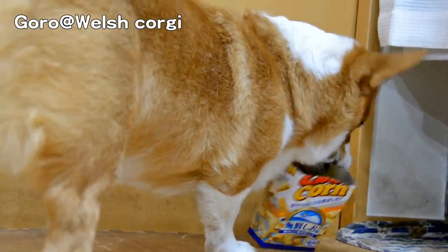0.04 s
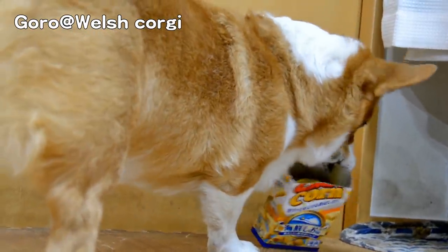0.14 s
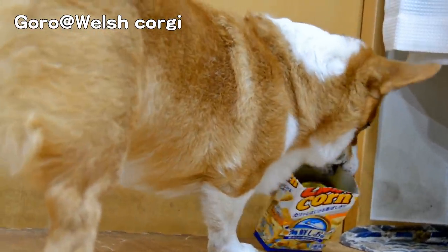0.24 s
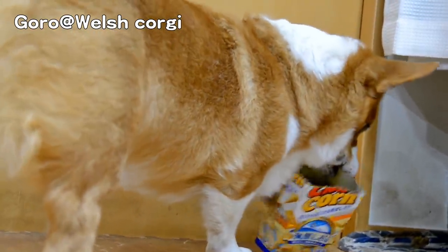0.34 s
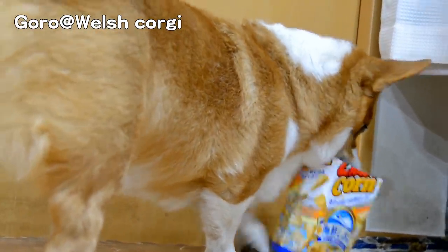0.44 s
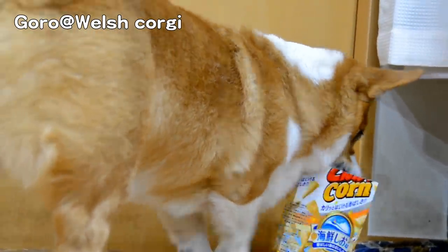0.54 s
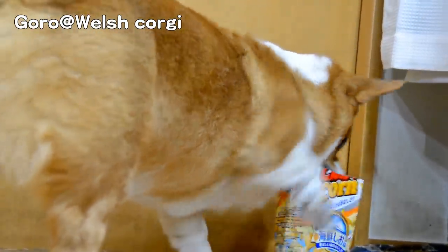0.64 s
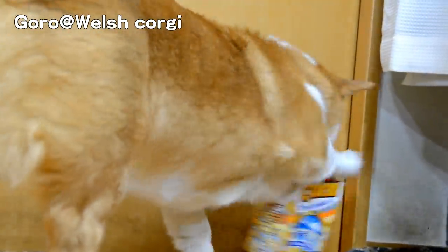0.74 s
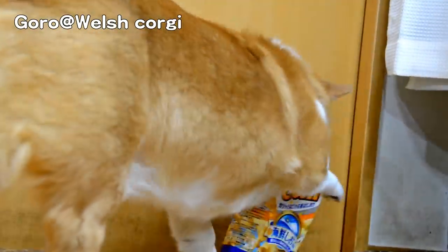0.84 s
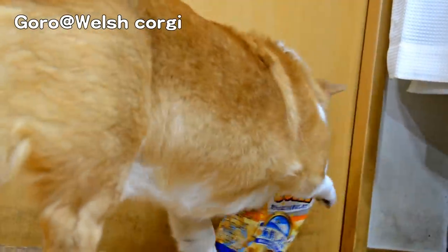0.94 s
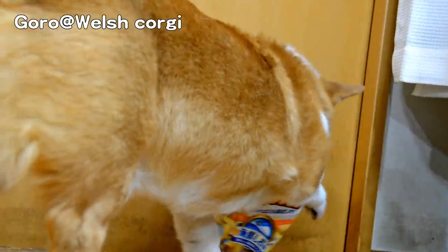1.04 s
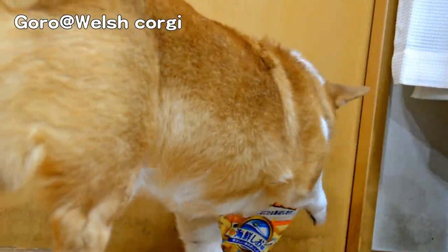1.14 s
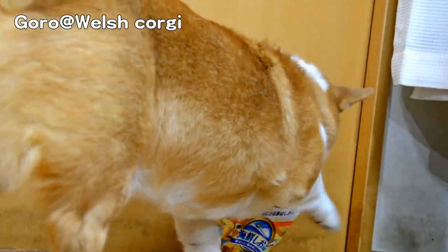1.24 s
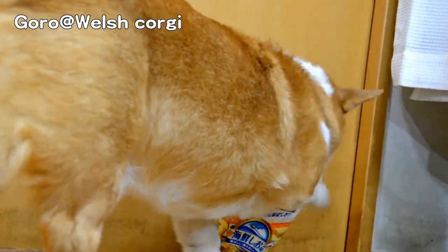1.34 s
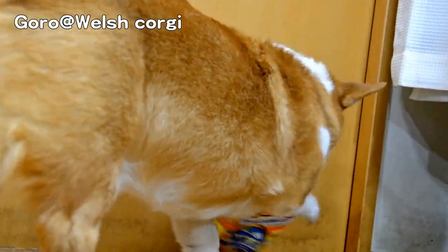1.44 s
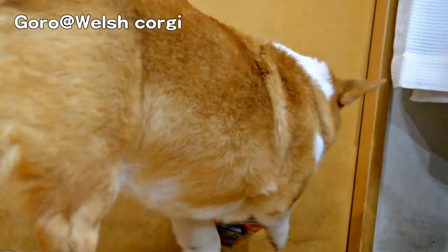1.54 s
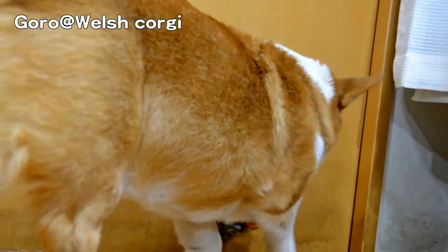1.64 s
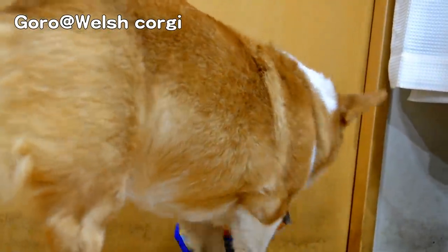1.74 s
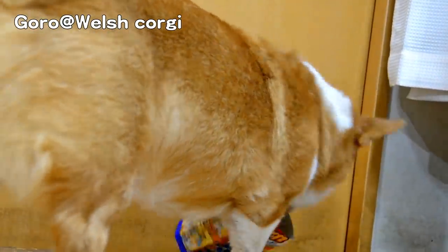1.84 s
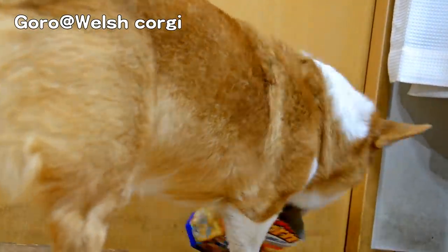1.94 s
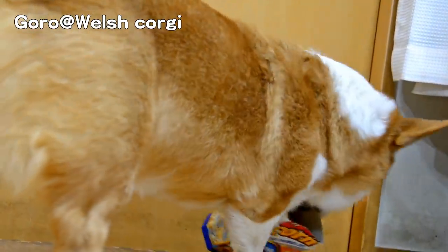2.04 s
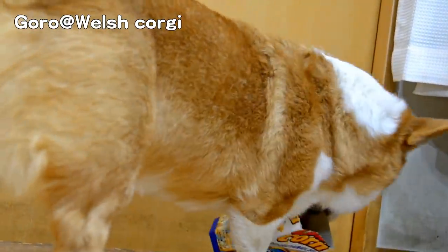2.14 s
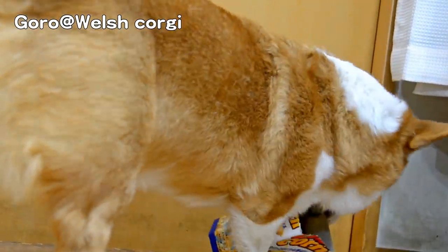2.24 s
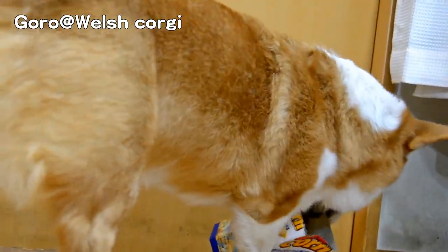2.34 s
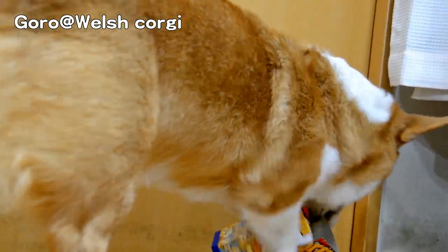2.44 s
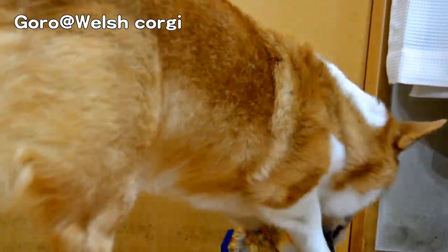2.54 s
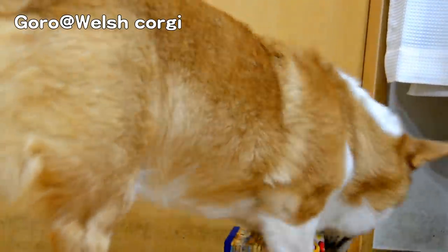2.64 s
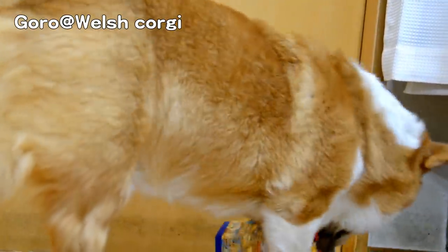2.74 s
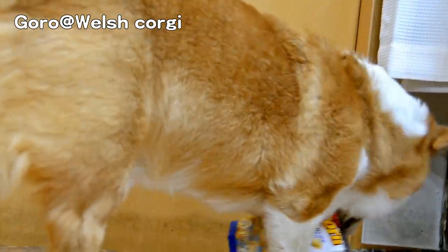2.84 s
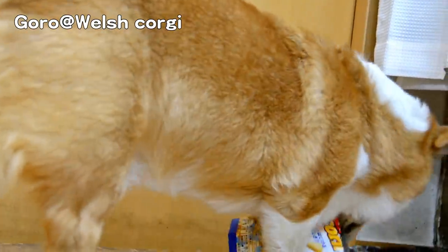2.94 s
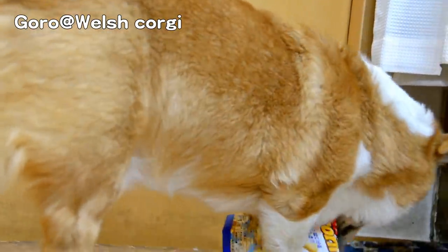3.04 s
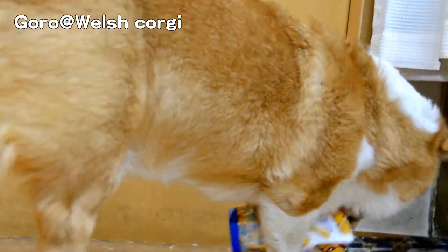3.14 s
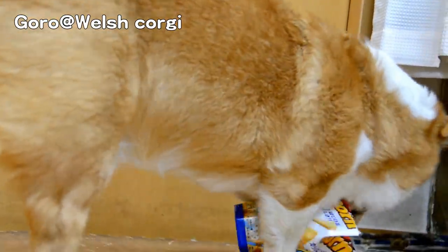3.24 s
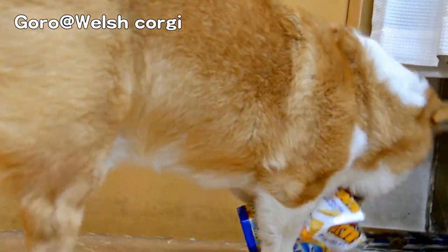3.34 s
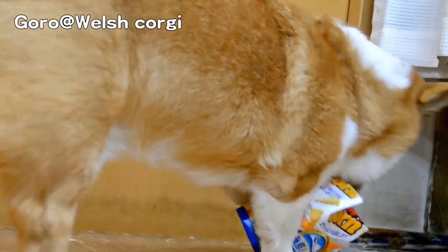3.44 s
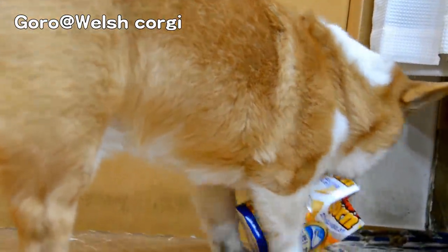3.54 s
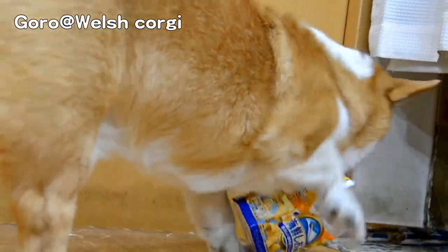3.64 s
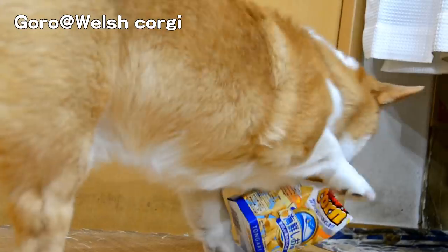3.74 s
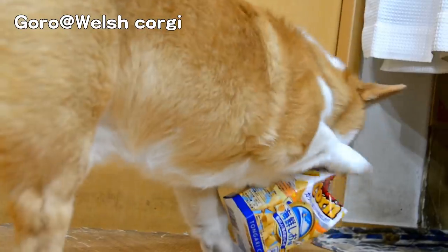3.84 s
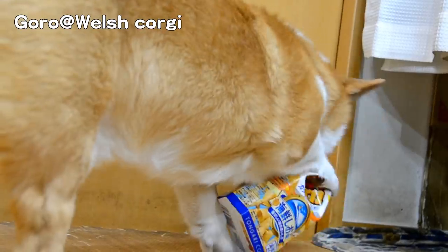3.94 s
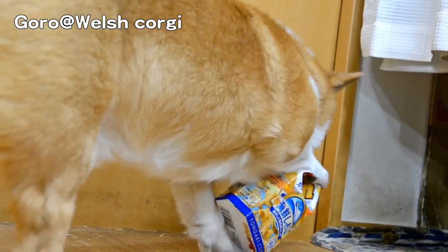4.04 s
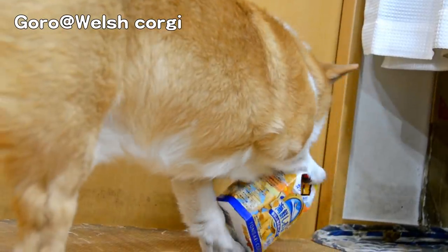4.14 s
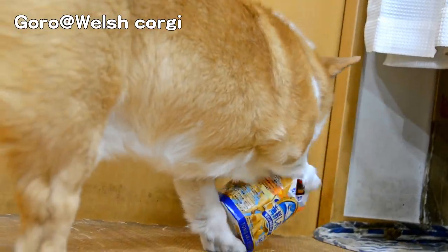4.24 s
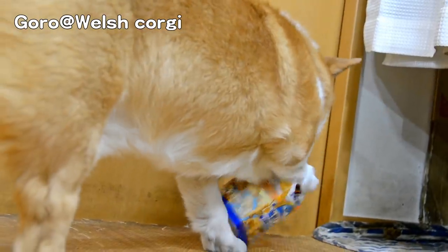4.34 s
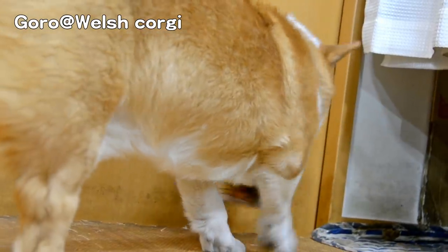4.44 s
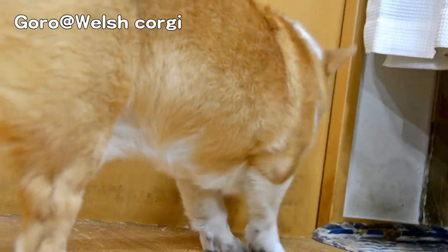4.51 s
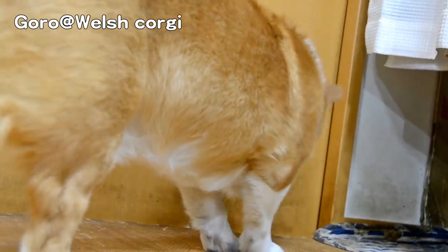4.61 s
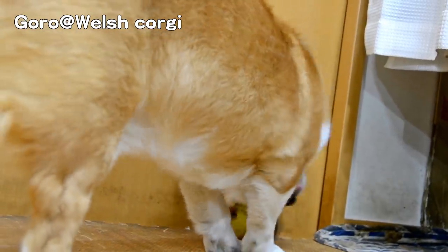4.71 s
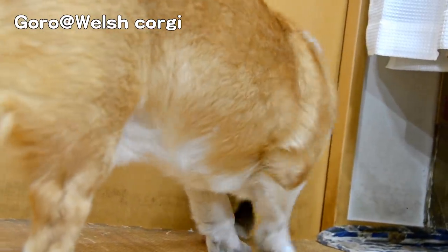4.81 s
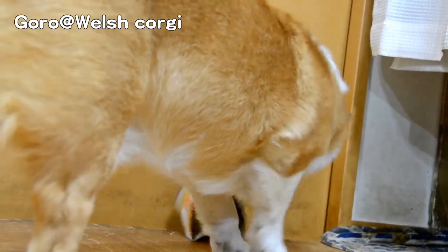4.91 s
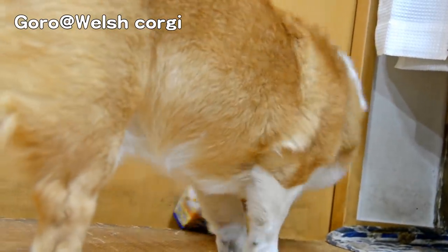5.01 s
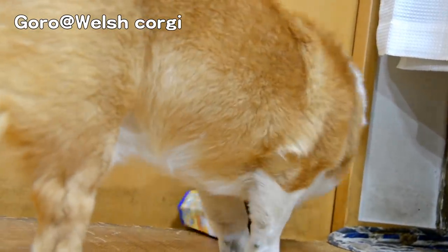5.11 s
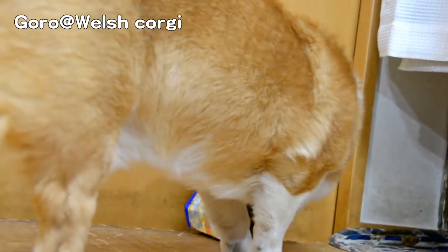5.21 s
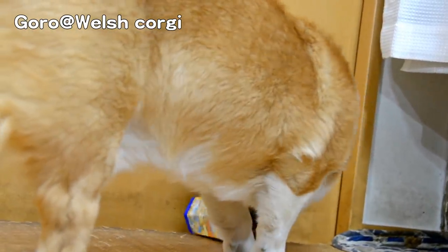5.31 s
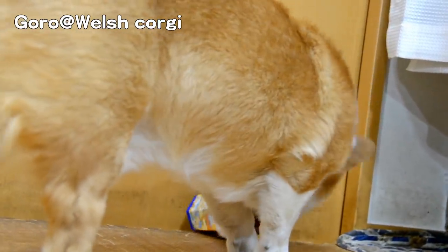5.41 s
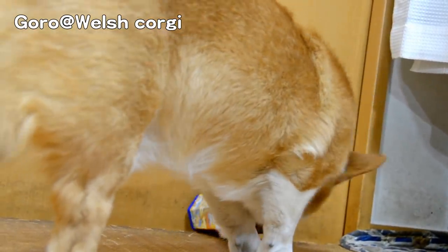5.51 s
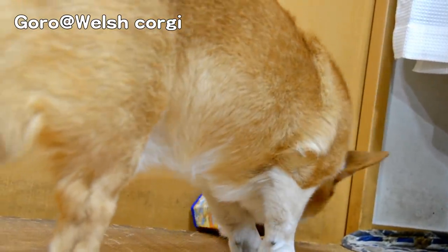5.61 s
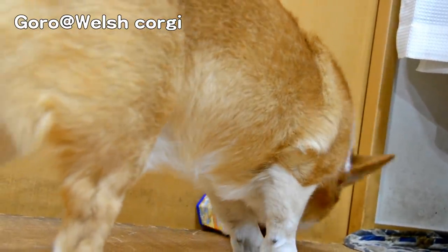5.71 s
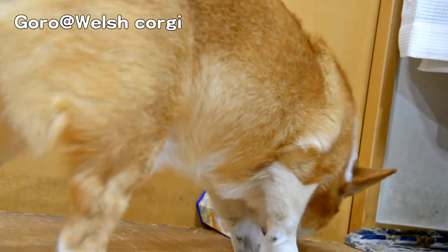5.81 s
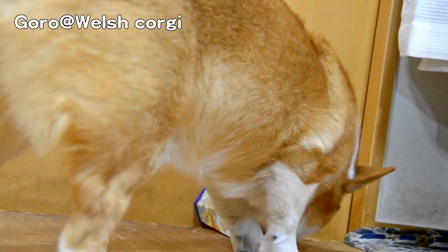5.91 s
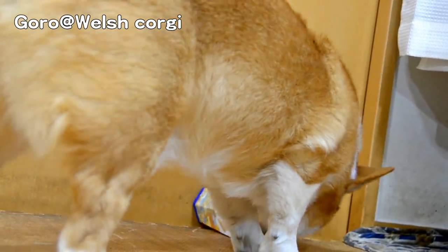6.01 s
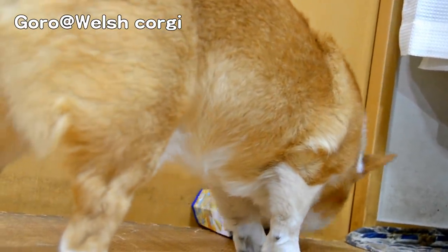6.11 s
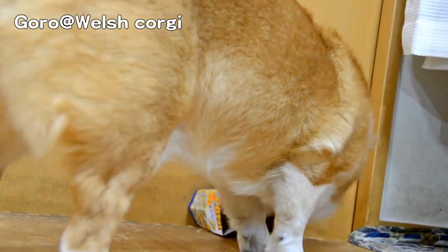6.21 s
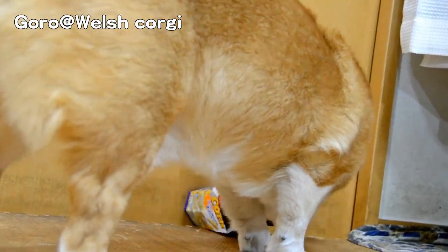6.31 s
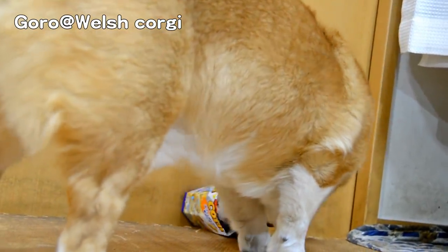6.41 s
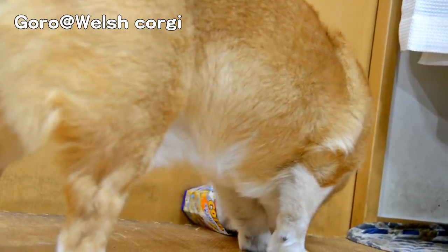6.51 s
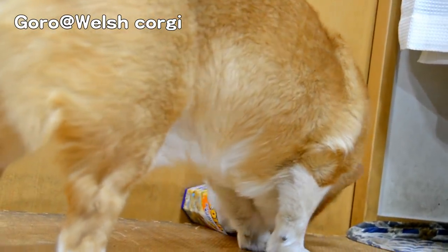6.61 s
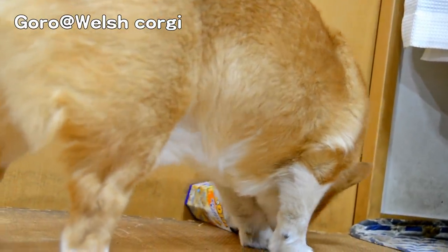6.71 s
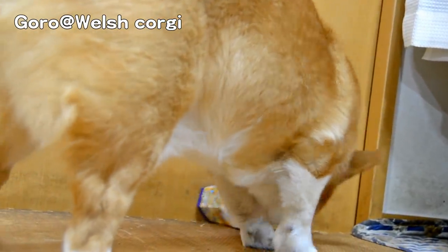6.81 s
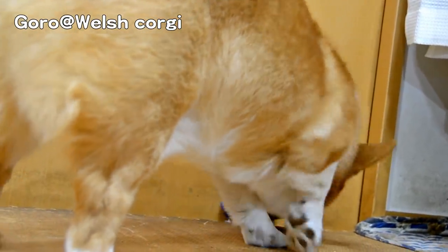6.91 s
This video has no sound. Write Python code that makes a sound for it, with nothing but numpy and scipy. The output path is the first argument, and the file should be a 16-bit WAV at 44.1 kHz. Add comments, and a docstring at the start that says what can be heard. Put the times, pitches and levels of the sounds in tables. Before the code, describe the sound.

A dog shoves a light cardboard carton over floorboards in a small room, heard close. Hollow papery knocks come in uneven bursts among stuttering scrapes, crinkles, claw ticks and soft paw thumps. The strongest blows, with deep floor booms, fall past the middle; then the knocking stops, leaving small rustles and scuffs over faint room air and a very high thin whine.

```python
"""A dog paws and noses a small cardboard carton over a wooden floor, close to a door in a small room.
From the start faint room noise and a thin electronic whine lie under stick-slip rubbing and soft hisses.
At once come blows that ring the carton's walls and stir the room, with ticks, snaps, rustles and pad thumps.
From 0.8 s the floorboards boom under weight, most strongly at about 4.8 s; the last blow falls near 5.8 s
and only small scrapes, rustles, pad thumps and soft hisses remain."""
import sys
import numpy as np
from scipy import signal
from scipy.fft import rfft, irfft, next_fast_len
from scipy.io import wavfile
from scipy.ndimage import uniform_filter1d

SR = 44100
rng = np.random.default_rng(int(sys.argv[2]) if len(sys.argv) > 2 else 0)


def file_out(sig):
    """Save sig as 16-bit WAV at sys.argv[1]."""
    # one column per channel
    cols = np.atleast_2d(sig).T
    # limit, then scale
    lim = np.clip(cols, -1, 1)
    pcm = np.round(lim * 32767).astype(np.int16)
    wavfile.write(sys.argv[1], SR, pcm)


N = 306936  # length [samples]

# edges of a blow's five registers: thud, hollow, knock, clack, crackle: (frequency [Hz])
REGISTER_EDGES = [130, 300, 700, 1200, 2400, 14000]


def undb(db):
    """Decibels to gain."""
    return 10 ** (np.asarray(db) / 20)


def unit(x):
    """Scale to rms 1."""
    return x / np.sqrt(np.mean(x ** 2) + 1e-30)


def seconds(length_s):
    """Time axis of a short sound [s]."""
    return np.arange(int(length_s * SR)) / SR


def at_hz(points, hz):
    """Read (Hz, value) points on a log-frequency axis."""
    f, value = np.transpose(points)
    return np.interp(np.log(hz + 1), np.log(f), value)


def at_time(points, t):
    """Read (s, value) points along time."""
    return np.interp(t, *np.transpose(points))


def colour(x, points):
    """Filter a sound by a curve of (Hz, dB) points, then scale to rms 1."""
    size = next_fast_len(2 * len(x))
    gain = undb(at_hz(points, np.fft.rfftfreq(size, 1 / SR)))
    return unit(irfft(rfft(x, size) * gain, size)[:len(x)])


def band(x, lo_hz, hi_hz, order=3):
    """Causal band-pass."""
    sos = signal.butter(order, [lo_hz, min(hi_hz, SR / 2 - 1)], "band", fs=SR, output="sos")
    return signal.sosfilt(sos, x)


def fade(t, t60):
    """Exponential decay, 60 dB down after t60."""
    return np.exp(-np.log(1000) * t / t60)


def walk(rate):
    """Smooth random wandering of rms 1, with a new target `rate` times a second."""
    k = max(int(SR / rate), 1)
    held = np.repeat(rng.standard_normal(N // k + 1), k)
    return unit(uniform_filter1d(held, k)[:N])


def add(out, s, x):
    """Mix a sound in at time s."""
    i = max(int(s * SR), 0)
    out[i:i + len(x)] += x[:max(N - i, 0)]


def room(t, wet_db, build_s=0.0055):
    """Direct sound, then reflections that thicken within milliseconds and die at a rate set for each octave."""
    # reverberation time of the room: (frequency [Hz], t60 [s])
    reverb_times = [(100, 0.29), (300, 0.2), (700, 0.22), (1500, 0.19), (4000, 0.25), (10000, 0.16)]
    start_rate, crowd_s = 420, 0.02  # echoes per second at first; time for that rate to double [s]
    density = np.minimum(start_rate / SR * (1 + (t / crowd_s) ** 2), 1)
    echoes = rng.choice([-1, 1], len(t)) * (rng.random(len(t)) < density) / np.sqrt(density)
    edges = 70 * 2. ** np.arange(9)  # octaves [Hz]
    tail = np.zeros(len(t))
    for lo, hi in zip(edges, edges[1:]):
        tail += band(echoes, lo, hi, order=2) * fade(t, at_hz(reverb_times, np.sqrt(lo * hi)))
    tail *= 1 - np.exp(-(t / build_s) ** 2)
    response = undb(wet_db) * tail / np.linalg.norm(tail)
    response[0] += 1  # the direct sound
    return response


def background():
    """Still room air as coloured noise, and an appliance's whine as a slightly wavering sine."""
    # colour of the still room: (frequency [Hz], relative level [dB])
    air_colour = [(20, -4), (45, -13), (70, -8), (94, 6.5), (120, -4.5), (180, 2.5), (270, -6), (420, -2.5),
                  (1000, -2.5), (1700, -8), (2500, -15), (4000, -24), (8000, -34), (12000, -34),
                  (14500, -64)]
    # the whine: (time [s], level [dB])
    whine_level = [(0, -65), (1.2, -66.5), (2.1, -66.5), (3.1, -64), (4.1, -73), (5.3, -70), (6.9, -72)]
    air_db, whine_hz = -56.5, 15631
    t = np.arange(N) / SR
    air = colour(rng.standard_normal(N), air_colour) * undb(air_db + 0.21 * walk(30))
    waver = .5 * walk(8)  # phase [rad]
    whine = unit(np.sin(2 * np.pi * whine_hz * t + waver))
    return air + whine * undb(at_time(whine_level, t) + 1.2 * walk(6))


def slips(rate, smooth):
    """Stick-slip: small catches of uneven size over a smooth sliding noise."""
    size = undb(3.5 * np.minimum(rng.exponential(size=N), 3))
    catches = (rng.random(N) < rate / SR) * rng.choice([-1, 1], N) * size
    return unit(catches) + smooth * rng.standard_normal(N)


def strokes(rows, rise_s, fall_s):
    """Level of strokes: each swells up to its start, holds and dies away; rise and fall are times for 60 dB."""
    t, power = np.arange(N) / SR, np.zeros(N)
    for s, length, db in rows:
        rise = fade(np.clip(s - t, 0, 1), rise_s)
        fall = fade(np.clip(t - s - length, 0, 1), fall_s)
        power += (undb(db) * rise * fall) ** 2
    return np.sqrt(power)


def shifting(force, points):
    """Rubbing heard from a carton on the move: its flexing walls shift resonance and its reflections change."""
    flex_octaves = 0.02  # rms shift of the resonances
    out, t = np.zeros(N), seconds(.2)
    step = int(.16 * SR)
    for i in range(0, N, step):
        flex = 2 ** (flex_octaves * rng.uniform(-np.sqrt(3), np.sqrt(3)))
        piece = signal.fftconvolve(force[i:i + step], room(t, wet_db=2.0))
        onset = np.minimum(np.arange(len(piece)) / (.002 * SR), 1)  # 2 ms ramp
        add(out, i / SR, onset * colour(piece, [(hz * flex, db) for hz, db in points]))
    return unit(out)


def crinkles(effort, count):
    """Creases in the card pop at random, each with its own pitch and size, louder the harder it is scraped."""
    # level of a small pop by its pitch: (frequency [Hz], relative level [dB])
    pop_levels = [(550, -10.5), (900, -0.5), (1600, 0), (2300, -2.5), (3600, -17)]
    decay_cycles = 9.2  # for the pop's decay factor to fall by 60 dB
    out, t = np.zeros(N), seconds(.03)
    lo_hz, hi_hz = pop_levels[0][0], pop_levels[-1][0]
    for when, pitch, size in rng.random((count, 3)):
        hz = lo_hz * (hi_hz / lo_hz) ** pitch
        db = at_hz(pop_levels, hz) + 14 * size ** 2  # few pops are large
        envelope = t * hz * fade(t * hz, decay_cycles)
        add(out, when * N / SR, undb(db) * np.sin(2 * np.pi * hz * t) * envelope)
    return signal.fftconvolve(unit(out) * effort, room(seconds(.3), wet_db=-7))[:N]


def rubbing_and_hisses():
    """Dragging drums the carton's hollow, scraping rasps and crinkles its walls, soft hisses swell over them."""
    # shoves that drag the carton over the floor: (start [s], length [s], level [dB])
    shoves = [(-.02, 0.016, -40.5), (.18, 0.058, -48.5), (.36, 0.16, -45), (.79, 0.069, -41.5),
              (.94, 0.15, -46), (1.22, 0.011, -45.5), (1.52, 0.15, -48), (1.74, 0.029, -51.5),
              (1.85, 0.013, -46), (2.05, 0.03, -50), (2.57, 0.2, -50.5), (2.85, 0.064, -48.5),
              (3.07, 0.039, -47), (3.165, 0.03, -40), (3.37, 0.29, -53.5), (3.895, 0.044, -51.5),
              (4.24, 0.0098, -46.5), (4.42, 0.077, -42), (4.65, 0.03, -45.5), (4.78, 0.096, -41),
              (4.88, 0.057, -49), (5.0, 0.075, -36.5), (5.19, 0.05, -46), (5.28, 0.045, -48),
              (5.54, 0.089, -49.5), (5.66, 0.12, -61), (6.18, 0.026, -58.5), (6.33, 0.061, -54.5),
              (6.81, 0.17, -53)]
    # strokes of paw or muzzle along the card: (start [s], length [s], level before the trim in rasp [dB])
    scrape_strokes = [(-.02, 0.019, -39.5), (.18, 0.074, -42.5), (.34, 0.16, -43), (.53, 0.04, -45.5),
                      (.63, 0.0055, -50), (.78, 0.05, -35.5), (1.04, 0.065, -51), (1.18, 0.15, -46),
                      (1.44, 0.014, -39), (1.545, 0.061, -39), (1.65, 0.14, -46), (1.97, 0.036, -38),
                      (2.05, 0.15, -49), (2.485, 0.015, -43.5), (2.57, 0.2, -45.5), (2.75, 0.16, -50),
                      (3.05, 0.072, -50.5), (3.17, 0.037, -41), (3.37, 0.039, -45.5), (3.47, 0.17, -48),
                      (3.775, 0.0074, -51), (3.875, 0.049, -44), (3.985, 0.0092, -36), (4.23, 0.01, -40.5),
                      (4.455, 0.028, -26), (4.63, 0.0096, -43.5), (4.775, 0.05, -39.5), (4.91, 0.024, -50),
                      (4.99, 0.041, -40.5), (5.18, 0.048, -48.5), (5.37, 0.027, -52), (5.54, 0.014, -44.5),
                      (5.72, 0.12, -51.5), (6.18, 0.033, -47), (6.34, 0.034, -51.5), (6.57, 0.032, -54.5),
                      (6.8, 0.055, -55.5), (6.86, 0.13, -45.5)]
    # soft hisses, perhaps sniffs or fur: (start [s], length [s], level before the lift in hiss [dB])
    soft_hisses = [(.36, 0.11, -67), (1.04, 0.037, -63.5), (1.55, 0.04, -81), (2.43, 0.031, -67),
                   (2.835, 0.09, -60.5), (3.07, 0.039, -66), (3.165, 0.074, -58.5), (3.375, 0.072, -62),
                   (3.52, 0.094, -67), (3.775, 0.031, -67), (3.99, .015, -74), (4.17, 0.086, -65),
                   (4.45, 0.023, -53), (6.15, 0.044, -68), (6.35, .02, -71), (6.85, 0.12, -63.5)]
    # light contact between strokes, which eases late on as the dog settles: (time [s], base level [dB])
    fidget_level = [(0, -69.5), (5.4, -57.5), (6, -71), (6.96, -83)]
    # colours of dragging, scraping and hissing, each: (frequency [Hz], relative level [dB])
    drag_colour = [(80, -43.5), (190, -9), (300, -1.5), (400, 2), (520, -1.5), (700, -4), (900, -10.5),
                   (1150, -2), (2000, -74)]
    scrape_colour = [(350, -28), (700, 4), (900, 9.5), (1170, 11.5), (1400, 9.5), (1700, 6.5), (2100, -5),
                     (2700, -7), (3400, -16), (6000, -58)]
    hiss_colour = [(1200, -24.5), (1900, 19), (2600, 10.5), (4000, 4.5), (6000, -2), (8500, -5.5),
                   (12000, -5.5), (13800, -12), (15000, -52)]
    fidget_drag_db, hiss_scrape_db, crinkle_db = -3.5, -25.5, -10  # shares of fidget, scrape and effort

    fidget = undb(at_time(fidget_level, np.arange(N) / SR) + 2 * walk(9.8))
    drag = np.hypot(strokes(shoves, rise_s=0.16, fall_s=0.23), undb(fidget_drag_db) * fidget)
    scrape = strokes(scrape_strokes, rise_s=0.093, fall_s=0.27)
    # a faint hiss also goes with every scrape
    swell = np.hypot(strokes(soft_hisses, rise_s=0.21, fall_s=0.15), undb(hiss_scrape_db) * scrape)
    effort = np.hypot(scrape, fidget)

    judder = slips(rate=170, smooth=.45)
    drum = shifting(judder, drag_colour) * drag * undb(1.8 * walk(31))
    grit = slips(rate=380, smooth=.4)
    rasp = shifting(grit, scrape_colour) * effort * undb(1.33 * walk(45) - 3.26)
    hiss = colour(slips(rate=870, smooth=1.5), hiss_colour) * swell * undb(2.5 * walk(37) + 5.0)
    return drum + rasp + hiss + crinkles(undb(crinkle_db) * effort, count=1600)


def ring(modes, t, detune, spread_db):
    """Damped modes; the point of contact shifts their pitch and share."""
    hz, db, t60 = np.transpose(modes)[:, :, None]
    chance = np.clip(rng.standard_normal((2, len(modes), 1)), -1.5, 1.5)
    sign = rng.choice([-1, 1], (len(modes), 1))
    gain = sign * undb(db + spread_db * chance[0])
    tone = np.sin(2 * np.pi * hz * (1 + detune * chance[1]) * t)
    return np.sum(gain * fade(t, t60) * tone, axis=0)


def crackle(t, rate):
    """Fibres of struck card give way in a quickly thinning burst of snaps, a few large and many small."""
    thinning = fade(t, 0.15)  # acts on both the rate and the size of the snaps
    sizes = rng.uniform(-1, 1, len(t)) ** 3
    fibres = (rng.random(len(t)) < rate / SR * thinning) * sizes
    fibres[int(.001 * SR)] = 1  # one sure snap after 1 ms
    return unit(band(fibres * thinning, 1460, 3700, order=2))


def register_levels(panel_hz, strength_db, weight_db, sharp_db):
    """Weight acts mostly on a blow's bass, sharpness on its treble; the struck panel lifts its own register."""
    # answer of each register, thud to crackle:
    # (level of a plain blow [dB], share of the weight [ratio], share of the sharpness [ratio])
    answers = [(-9, 1, 0.2), (-2.5, 0.46, 0), (-6, 0, 0), (-4.5, 0, 0.41), (-21.5, 0.11, 1)]
    panel_db, panel_octaves = 4.5, 0.32  # lift at the panel's note, and its reach
    plain_db, heavy, sharp = np.transpose(answers)
    centre = np.sqrt(np.multiply(REGISTER_EDGES[:-1], REGISTER_EDGES[1:]))
    near_panel = np.exp(-(np.log2(centre / panel_hz) / panel_octaves) ** 2)
    return strength_db + plain_db + heavy * weight_db + sharp * sharp_db + panel_db * near_panel


def blows():
    """Each blow is a crunch of card, a panel's note, carton modes and crackle, balanced by weight and sharpness."""
    # blows on the carton: (time [s], note of the struck panel [Hz], strength [dB],
    # weight behind it [dB], sharpness of the contact [dB])
    hits = [(0.07, 975, -33, -43, -17), (0.087, 860, -45.5, -33, 15), (0.161, 1300, -43, 0, 15),
            (0.179, 1410, -44, 0, 1), (0.212, 785, -46, -4, -8), (0.236, 900, -36, -20, -21),
            (0.252, 1200, -40.5, -7, -5), (0.316, 970, -49.5, 6, 8), (0.331, 925, -48, -6, -8),
            (0.409, 214, -46, 16.5, -8), (0.419, 323, -37.5, 14, -10), (0.452, 600, -32, 2, -8),
            (0.467, 600, -29, 0.5, -2.5), (0.766, 1500, -57, -8, 2), (0.776, 1640, -36.5, -6, 1),
            (0.781, 1490, -37, 3.5, 15.5), (0.828, 696, -43.5, 15, 5), (0.918, 680, -43.5, 8, -31),
            (1.013, 480, -55.5, 10, 7), (1.229, 920, -54.5, 11.5, 16), (1.284, 814, -22, -8.5, -12),
            (1.288, 1650, -27, -11, -4), (1.291, 520, -30, 6.5, -25), (1.41, 448, -47, 4.5, 11),
            (1.438, 1600, -48.5, -3, 16), (1.524, 960, -46.5, -7, -3), (1.554, 690, -38, -12, -3),
            (1.574, 1000, -36.5, -9, 10.5), (1.608, 940, -43, 2, 2), (1.665, 740, -24, -17.5, -9),
            (1.677, 793, -28, -3, -33), (1.839, 710, -49, 11.5, -5), (1.9, 1550, -54, -5, -8),
            (1.953, 906, -32, -7, -10), (1.974, 866, -34.5, -11, 7.5), (2.04, 1530, -46, 5.5, 18),
            (2.055, 810, -39, -4, -4), (2.102, 657, -21, -3, -6.5), (2.245, 615, -52.5, 4, -7),
            (2.317, 910, -52.5, -14, 10.5), (2.395, 940, -46, 2, 4), (2.616, 430, -28.5, -6, 2.5),
            (2.665, 1520, -56, 5, 10), (2.684, 890, -61, 13, 6), (2.718, 816, -34.5, -4, 4.5),
            (2.996, 494, -53.5, -3, 6), (3.011, 487, -51.5, -3, 3), (3.206, 364, -41.5, 10.5, -6),
            (3.304, 1370, -54, 0, 9), (3.346, 1350, -52, 0, 13), (3.392, 1420, -59, -1, 15),
            (3.511, 400, -60, 19.5, -10), (3.593, 915, -29, -2, -2.5), (3.747, 342, -57.5, 15, -2),
            (3.782, 1510, -55, 1, 10), (3.899, 820, -48.5, 1.5, 8), (3.971, 1620, -48, 0, 0),
            (3.981, 1550, -39, -17, 12), (3.99, 1800, -38.5, -6, 21.5), (4.07, 573, -40.5, 5, -28),
            (4.174, 339, -52, 14.5, 15), (4.223, 1400, -40.5, -2, 11), (4.378, 1410, -53.5, 9, -6),
            (4.402, 328, -50.5, 18, 10), (4.433, 307, -41, 16.5, 6), (4.445, 670, -24.5, -2, 7),
            (4.451, 895, -18.5, 0, 1.5), (4.482, 615, -29, -2, -2), (4.516, 1425, -28.5, -6.5, -20),
            (4.675, 396, -51, 15, -12), (4.767, 1010, -36, 6, 11), (4.771, 894, -24, 5.5, 7),
            (4.779, 383, -20.5, -0.5, 1), (4.797, 813, -26, 1, -1.5), (4.933, 820, -44.5, -1, -19),
            (4.966, 394, -50, -1, -12), (4.984, 394, -43, 1, 8), (5.002, 632, -29.5, -3.5, -26),
            (5.01, 1350, -36.5, 8.5, -2), (5.058, 460, -45, 8.5, 1), (5.075, 754, -51, 13, -10),
            (5.177, 610, -42.5, 10, -23), (5.19, 720, -38.5, 1, -20), (5.203, 1150, -37.5, -3, -24),
            (5.232, 653, -40.5, 4, -38), (5.532, 590, -35, 12.5, -36), (5.546, 1030, -38, 4, -30),
            (5.849, 1480, -53, -2, -3)]
    # modes of the carton on the boards: (frequency [Hz], relative level [dB], t60 [s])
    carton_modes = [(166.6, -17, 0.29), (222.7, -3, 0.076), (330, -3.5, 0.026), (355.6, 0.5, 0.065),
                    (433, -4, 0.13), (530, -23.5, 0.53), (593, -1, 0.18), (665.6, 8.5, 0.044),
                    (765, 7, 0.0087), (896.4, 4.5, 0.039), (1040, -6, 0.097), (1092, -8.5, 0.19),
                    (1285, -3.5, 0.12), (1416, 11.5, 0.02), (1637, 9, 0.02), (1710, -24, 0.031),
                    (2240, -13.5, 0.043), (2790, -1.5, 0.019)]
    # colour of the contact noise: (frequency [Hz], relative level [dB])
    contact_colour = [(60, 3.5), (180, 0.5), (400, 13), (950, 9), (1190, 3.5), (1550, 1.5), (2200, -6),
                      (3200, -17), (4600, -40), (6000, -37), (8000, -31), (12500, -35.5), (14500, -62)]
    # the carton comes into the open, then slides behind the dog's legs: (time [s], room share [dB])
    shelter = [(0, -2.5), (1.3, -5.5), (2.1, -2.5), (2.6, -4.5), (3.6, -7.5), (4.4, -3.5), (4.8, -1.5),
               (5.5, -2)]
    panel_cycles = 23.6  # for the panel to fall by 60 dB
    out, t = np.zeros(N), seconds(.4)
    attack = int(.025 * SR)
    for s, panel_hz, strength_db, weight_db, sharp_db in hits:
        register_db = register_levels(panel_hz, strength_db, weight_db, sharp_db)
        crunch = colour(rng.standard_normal(len(t)), contact_colour) * fade(t, 0.038)
        panel = np.sin(2 * np.pi * panel_hz * t) * fade(t * panel_hz, panel_cycles)
        hit = unit(ring(carton_modes, t, detune=0.038, spread_db=6.5))
        hit += undb(-0.5) * unit(crunch) + undb(-0.5) * unit(panel)
        hit += undb(-20) * crackle(t, rate=1500)
        # the card gives way, so the force takes about a millisecond to build
        hit *= 1 - np.exp(-(t / 0.00064) ** 2)
        # the carton lies somewhere new for every blow, so its reflections differ
        response = room(t, wet_db=at_time(shelter, s), build_s=0.0042)
        hit = signal.fftconvolve(hit, response)[:len(t)]
        blow = np.zeros(len(t))
        for k, (lo, hi, db) in enumerate(zip(REGISTER_EDGES, REGISTER_EDGES[1:], register_db)):
            part = band(hit, lo, hi)
            # level set over the attack; neighbouring registers take opposite signs
            blow += (-1) ** k * undb(db) * part / np.std(part[:attack])
        add(out, s, blow)
    return out


def claws():
    """A claw's tip on the glossy card makes a tiny dry tick of noise that the room carries on."""
    # ticks: (time [s], centre frequency [Hz], peak level before the room [dB])
    ticks = [(0.073, 5500, -53), (0.09, 3600, -59), (0.161, 5000, -54), (0.178, 2800, -42),
             (0.237, 6000, -48), (0.314, 5600, -42.5), (0.9, 2560, -33), (1.438, 3400, -51),
             (1.575, 4000, -45.5), (1.975, 3380, -45), (2.72, 3400, -49), (3.348, 2860, -42),
             (3.371, 3200, -50), (3.972, 9000, -44)]
    out, t = np.zeros(N), seconds(.3)
    for s, hz, db in ticks:
        tick = band(rng.standard_normal(len(t)) * fade(t, .008), hz / 1.6, hz * 1.6, order=3)
        add(out, s, undb(db) * signal.fftconvolve(tick / np.abs(tick).max(), room(t, wet_db=-8.5)))
    return out


def snaps():
    """A stiff fold gives way under a hard blow: a brief bright ring of narrow noise that the room carries on."""
    # snaps: (time [s], note [Hz], peak level before the room [dB])
    folds = [(0.089, 2670, -41), (0.18, 2840, -48), (0.237, 2800, -49), (1.285, 2890, -33),
             (1.285, 4620, -41.5), (1.666, 3850, -46), (2.041, 4600, -47), (2.059, 3050, -41.5),
             (2.102, 2670, -46), (2.617, 2930, -36.5), (2.618, 3930, -39), (2.665, 2900, -48),
             (2.72, 4270, -49), (3.992, 4240, -36), (4.455, 2730, -41), (4.772, 2860, -35)]
    width, die_s = 0.16, 0.0084  # bandwidth relative to the note; t60 of the burst [s]
    out, t = np.zeros(N), seconds(.25)
    for s, hz, db in folds:
        burst = rng.standard_normal(len(t)) * fade(t, die_s)
        snap = band(burst, hz * (1 - width / 2), hz * (1 + width / 2), order=2)
        add(out, s, undb(db) * signal.fftconvolve(snap / np.abs(snap).max(), room(t, wet_db=0.5)))
    return out


def rustles():
    """The carton's thin open flap crackles in small, separate grains."""
    # rustles: (start [s], length [s], tuning frequency [Hz], level before the room [dB])
    flap = [(0.16, 0.09, 3000, -63), (0.573, 0.07, 2970, -62), (1.438, 0.02, 3600, -57),
            (1.57, 0.023, 3300, -51), (1.81, 0.037, 3070, -62), (2.485, .035, 3080, -63),
            (2.612, 0.018, 3980, -59), (2.66, .03, 2500, -53), (2.716, 0.02, 4300, -59),
            (3.365, 0.07, 4030, -63), (3.348, 0.076, 1900, -54), (3.522, .03, 4330, -71),
            (3.863, .075, 5250, -76), (3.982, 0.02, 2950, -49), (4.46, 0.045, 2580, -53),
            (4.764, 0.025, 2600, -55), (5.69, 0.044, 1900, -62), (6.08, .14, 2700, -67),
            (6.34, .05, 1900, -64)]
    grains = slips(rate=190, smooth=.2)
    rustle = np.zeros(N)
    for s, length, hz, db in flap:
        tone = unit(band(grains, hz / 1.64, hz * 1.02, order=2))
        rustle += tone * strokes([(s, length, db)], rise_s=0.041, fall_s=0.11)
    return signal.fftconvolve(rustle, room(seconds(.25), wet_db=-1))[:N]


def card_ringing():
    """Narrow-band ringing of the card, from skids or lingering after blows, made from quick filtered catches."""
    # ringing: (start [s], length [s], note [Hz], level [dB])
    ringing = [(0.249, 0.031, 1295, -38), (0.343, 0.1, 1340, -52), (1.433, 0.021, 1420, -51),
               (3.412, 0.3, 1480, -55), (3.77, .2, 1670, -57.5), (4.86, 0.075, 676, -45),
               (5.192, .11, 663, -53), (5.861, 0.012, 1440, -52.5)]
    width = 0.086  # bandwidth relative to the note
    catches = slips(rate=900, smooth=.6)
    out = np.zeros(N)
    for s, length, hz, db in ringing:
        note = unit(band(catches, hz * (1 - width / 2), hz * (1 + width / 2), order=2))
        out += note * strokes([(s, length, db)], rise_s=0.11, fall_s=0.076)
    return out


def pads():
    """A soft paw pad lands on the floor with a dull, short thump of low noise."""
    # thumps: (time [s], peak level [dB])
    landings = [(0.317, -58), (1.609, -40.5), (1.821, -43), (1.957, -37.5), (4.16, -40.5), (5.009, -42),
                (5.63, -58), (5.689, -54), (5.936, -57), (6.809, -54)]
    out, t = np.zeros(N), seconds(.3)
    for s, db in landings:
        thump = band(rng.standard_normal(len(t)) * fade(t, 0.13), 105, 218, order=2)
        add(out, s, undb(db) * thump / np.abs(thump).max())
    return out


def boards():
    """Weight coming down in heavy steps and blows leaves the floor humming in its slow modes."""
    # booms: (time [s], level [dB])
    booms = [(0.785, -45), (1.284, -30), (1.662, -38.5), (1.951, -32), (2.616, -33.5), (2.716, -32.5),
             (3.595, -41), (4.451, -27), (4.783, -19), (5.003, -22.5), (5.536, -31)]
    # slow modes of the floor: (frequency [Hz], relative level [dB], t60 [s])
    floor_modes = [(38, -55, 1), (54.3, -36, 3), (71.5, -21, 0.15), (87.5, -15.5, 0.31), (96, -11.5, 0.13),
                   (124, -18, 0.16), (155, -23.5, 0.37)]
    out, t = np.zeros(N), seconds(1.4)
    for s, db in booms:
        hum = ring(floor_modes, t, detune=.008, spread_db=1)
        add(out, s, undb(db) * hum * (1 - np.exp(-t / 0.0026)))
    return out


def corner(x):
    """The corner between floor and door lifts some notes and swallows others, by fixed peaks and hollows."""
    # applied one after another: (centre [Hz], width [Hz], gain [dB])
    peaks = [(310, 38, -1), (341, 76, 1), (503, 160, 1), (831, 35, 1.5), (1177, 27, -6), (1580, 175, 1),
             (2374, 107, -2.5), (3450, 510, -5), (3750, 170, -1)]
    for hz, width, db in peaks:
        x = x + (undb(db) - 1) * band(x, hz - width / 2, hz + width / 2, order=1)
    return x


def scene():
    """All sources at one microphone; the corner colours only dog and carton."""
    dog_and_carton = blows() + snaps() + claws() + pads() + rubbing_and_hisses() + card_ringing() + rustles()
    return (corner(dog_and_carton) + boards() + background())[None]


def record(dry):
    """The recorder rounds the highest peaks and cuts the top."""
    ceiling, top_hz = .95, 16000
    rounded = ceiling * np.tanh(dry / ceiling)
    return signal.sosfilt(signal.ellip(10, .1, 80, top_hz, fs=SR, output="sos"), rounded)


dry = scene()
out = record(dry)
file_out(out)
```